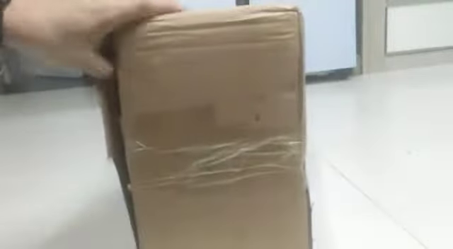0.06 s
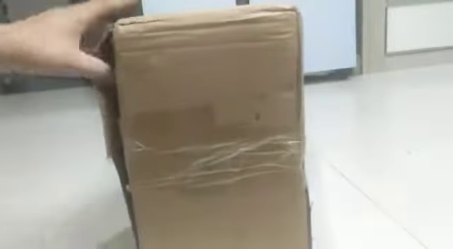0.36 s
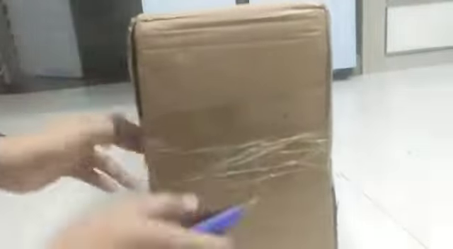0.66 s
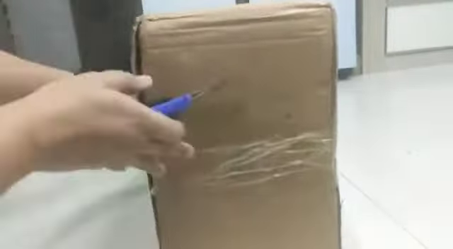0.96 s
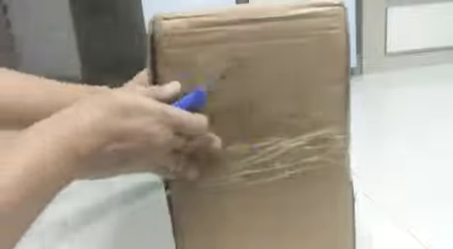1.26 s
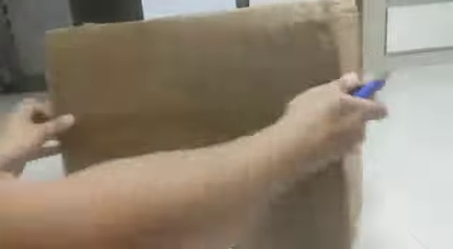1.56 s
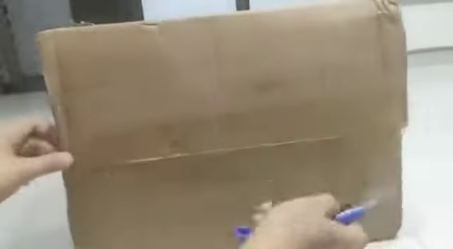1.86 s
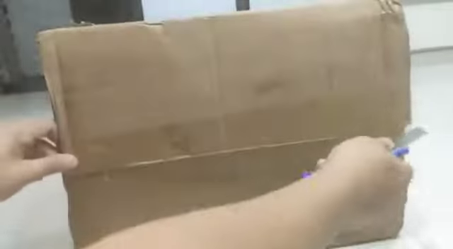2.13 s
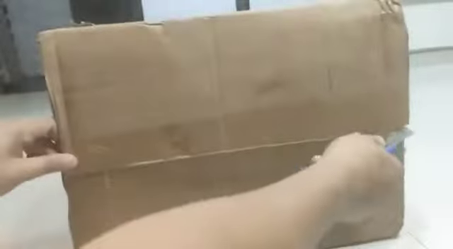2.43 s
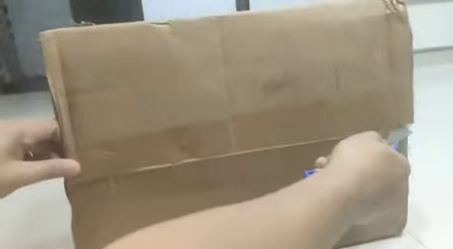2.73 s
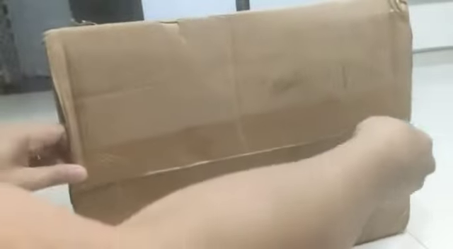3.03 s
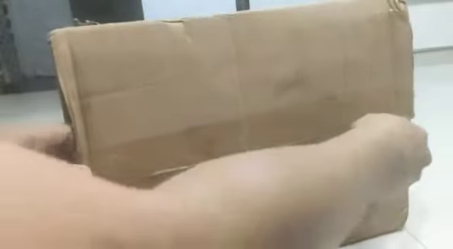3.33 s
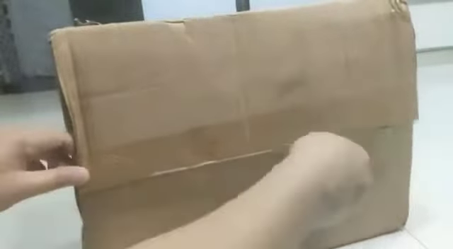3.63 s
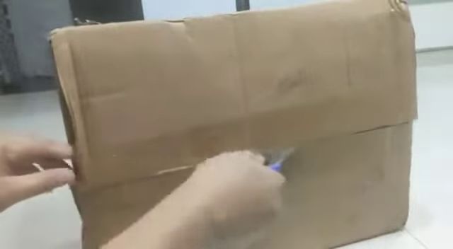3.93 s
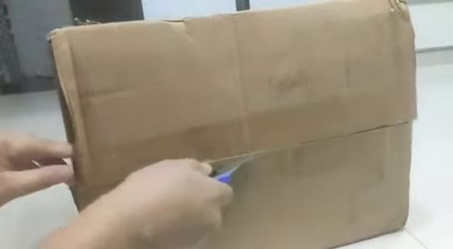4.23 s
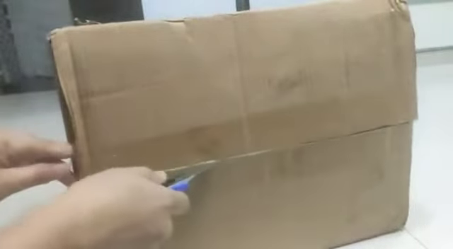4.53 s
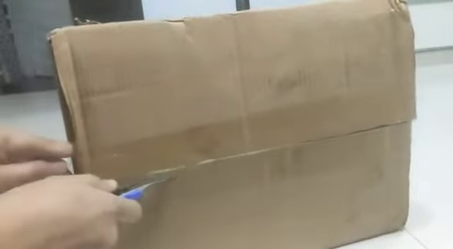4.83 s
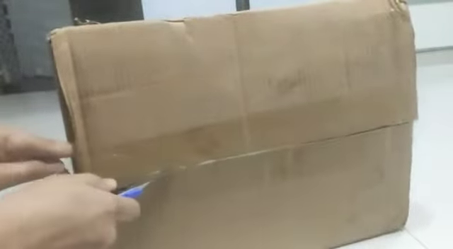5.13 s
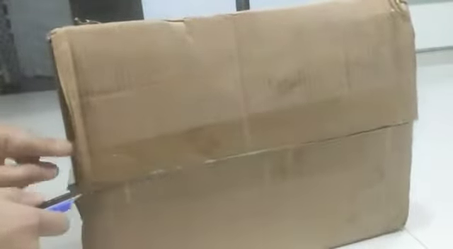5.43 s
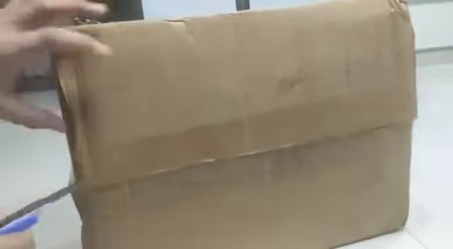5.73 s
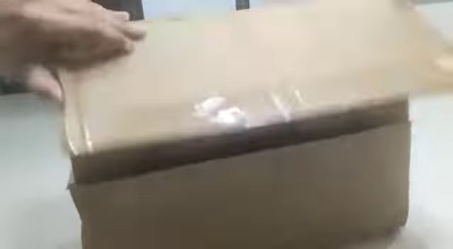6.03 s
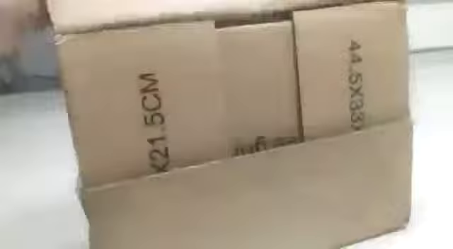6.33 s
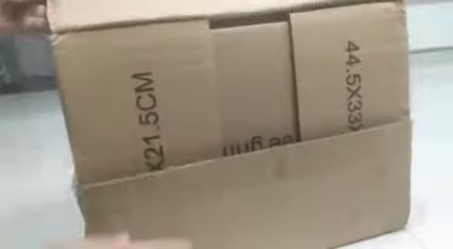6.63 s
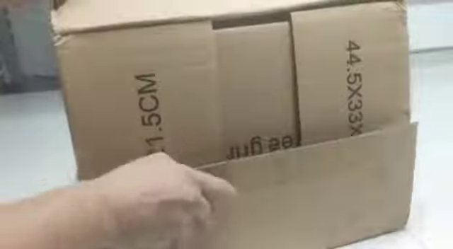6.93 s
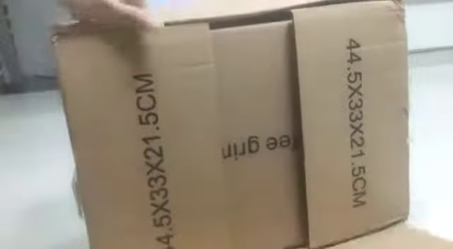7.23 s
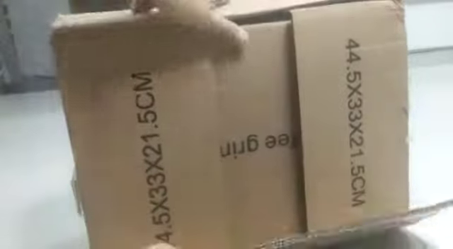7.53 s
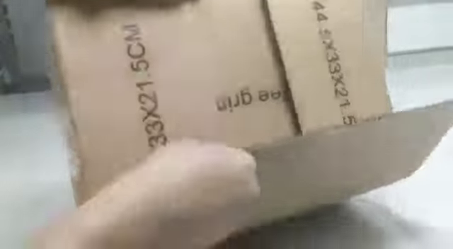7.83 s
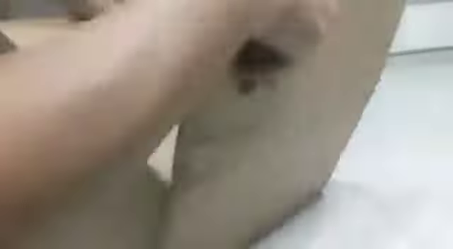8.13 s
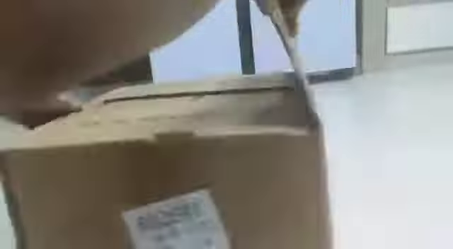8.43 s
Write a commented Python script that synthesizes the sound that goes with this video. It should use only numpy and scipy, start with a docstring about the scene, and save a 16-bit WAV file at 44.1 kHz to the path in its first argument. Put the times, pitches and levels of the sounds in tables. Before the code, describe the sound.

Hands rub and knock a hollow cardboard box, a utility knife cuts the tape, and the flaps rip open in a small room.

```python
"""A cardboard box is cut open in a small bare room. First hands rub the board: creases crack, knocks
boom in the hollow box, fingers squeak, and it creaks and slides round on the hard floor. From 3.3 s a
utility knife judders into the tape, ticks free and bumps along the seam. At 6 s the last strip rips in
a quick run of snaps, each a burst of tiny fractures. The flaps fold back, cracking, and at 8.4 s the
box tips over."""
import sys
import numpy as np
from scipy import signal
from scipy.fft import rfft, irfft
from scipy.io import wavfile
from scipy.ndimage import uniform_filter1d

SR = 44100
rng = np.random.default_rng(int(sys.argv[2]) if len(sys.argv) > 2 else 0)


def bounce(signal):
    """Save signal as a 16-bit WAV file at the path given by the first command-line argument."""
    frames = np.transpose(np.atleast_2d(signal))
    limited = np.clip(frames, -1, 1)
    pcm = np.round(limited * 32767).astype(np.int16)
    wavfile.write(sys.argv[1], SR, pcm)


N = 373527
TIME = np.arange(N) / SR


def amp(db):
    """Decibels to gain."""
    return 10 ** (np.asarray(db) / 20)


def unit_rms(x):
    """Scales each row to rms 1."""
    return x / np.sqrt(np.mean(x ** 2, -1, keepdims=True) + 1e-20)


def unit_hit(x):
    """Scales each row to the energy of 10 ms at rms 1."""
    return x / np.sqrt(np.sum(x ** 2, -1, keepdims=True) * 100 / SR + 1e-20)


def curve_at(points, hz):
    """Reads a curve on a log-frequency axis."""
    f, value = np.transpose(points)
    return np.interp(np.log(hz + 1), np.log(f + 1), value)


def eq(x, points):
    """Shapes the spectrum of x with an EQ curve."""
    hz = np.fft.rfftfreq(x.shape[-1], 1 / SR)
    return irfft(rfft(x) * amp(curve_at(points, hz)), x.shape[-1])


def band(x, lo_hz, hi_hz, order=3):
    """Causal band-pass."""
    return signal.sosfilt(signal.butter(order, [lo_hz, hi_hz], "band", fs=SR, output="sos"), x)


def resonate(x, hz, width_hz):
    """One resonance of gain 1."""
    return signal.lfilter(*signal.iirpeak(hz, hz / width_hz, SR), x)


def add(mix, s, sound):
    """Mixes a sound in at time s."""
    part = mix[:, max(round(s * SR), 0):][:, :sound.shape[-1]]
    part += sound[..., :part.shape[1]]


def track(events):
    """Lays (time, sound) pairs on one mid/side track."""
    out = np.zeros((2, N))
    for s, sound in events:
        add(out, s, sound)
    return out


def fader(times, db):
    """Gain riding through level points, silent outside them."""
    return amp(np.interp(TIME, times, db, left=-np.inf, right=-np.inf))


def wander(per_s):
    """Smooth random motion of rms 1."""
    hz = np.fft.rfftfreq(N, 1 / SR)
    return unit_rms(irfft(rfft(rng.standard_normal(N)) / (1 + (hz / per_s) ** 4), N))


def grit(size, spread_db):
    """Mid and side streams of tiny fractures of uneven size, 12 samples each."""
    sizes = amp(spread_db * np.clip(rng.standard_normal(size // 12 + 1), -2.5, 2.5))
    return rng.standard_normal((2, size)) * np.repeat(sizes, 12)[:size]


# EQ of the quiet room: (frequency [Hz], gain [dB])
ROOM_TONE_EQ = [(20, 1), (50, 2.5), (100, -5.5), (200, -0.5), (450, 3), (750, -4), (1400, -6.5),
                (2600, -14.5), (5000, -14), (6600, -17.5), (8200, -25), (14000, -32)]
def room_tone(db=-59):
    """A steady bed of dark noise."""
    return amp(db) * unit_rms(eq(rng.standard_normal((2, N)), ROOM_TONE_EQ))


# modes of the box: (frequency [Hz], width [Hz], gain [dB])
BOX_MODES = [(51, 85, -9), (126, 12, -9.5), (151.5, 27, -5), (193, 17.8, 1.5), (266.6, 35.4, -0.5),
             (323, 37, -1.5), (377.6, 42, 1.5), (521.5, 176, 2.5), (590, 268, 2), (860, 94, -7.5)]
def box_body(x):
    """The panels and the air inside ring."""
    return sum((-1) ** k * amp(db) * resonate(x, hz, width)
               for k, (hz, width, db) in enumerate(BOX_MODES))


# hand, blade or floor strokes the board:
# (start [s], length [s], hiss [dB], swell over the stroke [dB], scrape re hiss [dB], rumble re hiss [dB])
RUB_STROKES = [(0, 0.1, -46.5, 2, -3, -10.5), (0.206, 0.39, -57.5, -5, 0.5, -5.5),
               (0.51, 0.21, -46.5, 9.5, -10, -11), (0.77, 0.12, -59.5, 0, 0, -6),
               (0.937, 0.14, -59.5, -9, 0.5, -3), (1.1, 0.13, -62, 11, 3.5, -12),
               (1.422, 0.17, -58, -3, 11.5, -7), (1.731, 0.21, -48, -1, -9.5, -8),
               (2.298, 0.14, -55.5, 12, -10, -14), (2.524, 0.054, -64, -24, 3.5, 4),
               (2.635, 0.2, -53, -5, -4, -7), (2.84, 0.21, -61.5, 21, -4, -9), (3.024, 0.1, -61.5, 6, 3, 5),
               (3.217, 0.28, -52, -4.5, 1, -2), (3.485, 0.16, -54, -15.5, 6.5, 1.5),
               (3.708, 0.18, -54.5, 6.5, -1.5, -3), (3.926, 0.58, -58, -0.5, -2, -1.5),
               (4.476, 0.29, -59.5, 6.5, 0.5, -2), (5.016, 0.081, -49, -4.5, 4, 0),
               (5.177, 0.47, -54.5, -2, 0, -3.5), (5.645, 0.1, -47, -8.5, -4.5, -15),
               (5.944, 0.052, -40, 4, -6, -13), (5.995, 0.18, -37, -12, -10, -12),
               (6.13, 0.023, -34, -7.5, 4.5, -8), (6.21, 0.21, -46, -4, -7, -8),
               (6.453, 0.11, -37, 3, -6.5, -20), (6.595, 0.2, -50.5, 4, 2.5, -2),
               (6.887, 0.12, -53, -6, 0, -5), (6.994, 0.04, -44, 1.5, -5, 1),
               (7.089, 0.18, -49, 10.5, 2, -3), (7.31, 0.18, -54.5, 13, -4, -2),
               (7.465, 0.046, -50.5, -2, 3.5, -2), (7.564, 0.081, -49, 0, -1, -2),
               (7.673, 0.16, -47.5, 1, -0.5, -7.5), (7.867, 0.15, -49.5, 0, 2.5, -5.5),
               (8.019, 0.15, -45.5, 1, -2.5, -4), (8.165, 0.18, -50, 2, 1.5, -4),
               (8.315, 0.024, -47.5, 9, 3, -5), (8.357, 0.32, -45.5, -16, 3, 1)]
def stroke_envelopes(attack_s=0.012, release_s=0.056):
    """Gains of hiss, scrape and rumble: each stroke bites, swells or fades, and lifts off."""
    power = np.zeros((3, N))
    for s, length, db, swell_db, scrape_db, rumble_db in RUB_STROKES:
        t = np.arange(0, length + 10 * release_s, 1 / SR)
        shape = np.minimum(t / attack_s, 1) * np.exp(-np.maximum(t - length, 0) / release_s)
        travel = np.minimum(t / length, 1) - .5
        hiss = shape * amp(db + swell_db * travel)
        add(power, s, (hiss * amp([[0], [scrape_db], [rumble_db]])) ** 2)
    return np.sqrt(power)


def fibre_chirps(lo_hz, hi_hz, count, ring_s=0.0048, spread_db=3):
    """Tiny stick-slip squeaks, each at its own pitch."""
    t = TIME[:1024]
    when, pitch, size, side = rng.random((4, count, 1))
    hz = lo_hz * (hi_hz / lo_hz) ** pitch
    gain = amp(-spread_db * np.log(size + 0.042))
    chirps = gain * t * np.exp(-t / ring_s) * np.sin(2 * np.pi * hz * t)
    place = (when * (N - len(t))).astype(int) + np.arange(len(t)) + N * (side < .5)
    return unit_rms(np.bincount(place.ravel(), chirps.ravel(), 2 * N).reshape(2, N))


# EQ of rubbed board: (frequency [Hz], gain [dB])
RUB_EQ = [(500, 10.5), (1200, 8.5), (2200, -0.5), (3000, -2.5), (4000, -3.5), (5400, -5), (6700, -1.5),
          (8000, -12), (11000, -17), (14500, -28.5)]
def rubbing(hiss, scrape, rumble, grip_db=2, grip_per_s=35):
    """Fibres catch and let go, some with a squeak; the uneven grip shakes all bands together."""
    fibres = eq(grit(N, spread_db=4), RUB_EQ)
    grip = unit_rms(amp(grip_db * wander(grip_per_s)))
    panels = unit_rms(box_body(fibres) * amp(wander(grip_per_s)))
    board = unit_rms(band(fibres, 617, 2030)) + 0.54 * fibre_chirps(758, 1980, count=2400)
    paper = unit_rms(band(fibres, 1900, 17500)) + 0.26 * fibre_chirps(2756, 4760, count=3000)
    return grip * (amp(-1) * rumble * panels + amp(-4) * scrape * board + amp(-2) * hiss * paper)


# EQ of breaking board: (frequency [Hz], gain [dB])
FRACTURE_EQ = [(500, -9), (1200, 4), (2200, -0.5), (3000, -2), (4200, -2), (6700, -2.5), (8200, -10),
               (12000, -18.5), (14500, -30)]
# a snap's body, bite and top bands: (low edge [Hz], high edge [Hz])
SNAP_BANDS = [(600, 2200), (2200, 7200), (7200, 15000)]
def snap(db, body_db, top_db, hz, rise_s, decay_s, spread_db=1, ring_db=2, ring_width=0.092,
         edge_echo=0.23, colour=FRACTURE_EQ):
    """An avalanche of fractures rings a patch of board; db sets the bite, body and top are re bite."""
    t = TIME[:3072]
    past_peak = np.maximum(t - rise_s, 0)
    envelope = np.minimum(t / max(rise_s, 1e-4), 1) ** 2 * np.exp(-past_peak / decay_s)
    envelope *= 1 + 0.25 * np.exp(-past_peak / 0.001)  # the first break is the hardest
    crack = eq(grit(len(t), spread_db), colour) * envelope
    # the panel's edges throw the crack back at uneven delays, which hollows its colour
    delays = (SR * rng.uniform(.0002, .0012, 3)).astype(int)
    crack += edge_echo * sum((-1) ** k * np.roll(crack, d, 1) for k, d in enumerate(delays))
    crack += amp(ring_db) * resonate(crack, hz, max(ring_width * hz, 850))
    return sum(amp(db + offset) * unit_hit(band(crack, *edges))
               for offset, edges in zip((body_db, 0, top_db), SNAP_BANDS))


def crinkles(hiss, count=40, low_hz=1500, high_hz=6000):
    """Faint stray snaps come at random, riding the level of the rubbing."""
    out = np.zeros((2, N))
    for when, size, pitch in rng.random((count, 3)):
        hz = low_hz * (high_hz / low_hz) ** pitch
        crinkle = snap(db=-3 + 4 * size, body_db=-4, top_db=-9, hz=hz, rise_s=0.00066, decay_s=0.013)
        add(out, when * N / SR, hiss[int(when * N)] * crinkle)
    return out


# creases and cut edges crack: (time [s], bite [dB], body re bite [dB], ring [Hz], rise [s], decay [s])
CRACK_CUES = [(.147, -45, -1, 2400, 0.00098, 0.005), (.162, -47, 0, 3660, 0.00087, 0.012),
              (.593, -41.5, -3, 4090, 0.0055, .004), (.712, -44, -8, 2600, 0.0024, 0.011),
              (1.661, -45.5, 2.5, 1500, 0.0016, 0.0065), (2.2451, -30, -13.5, 2750, 0.001, 0.007),
              (2.794, -32, -10.5, 2920, 0.0037, 0.0039), (3, -41.5, -6, 5700, 0.00081, 0.01),
              (3.126, -49.5, 1, 1570, 0.0011, 0.0047), (3.196, -32, 0.5, 1500, 0.0016, 0.0038),
              (3.402, -48, 4, 1580, 0.0011, 0.0044), (4.6245, -48.5, -8, 5760, 0.0004, 0.0024),
              (4.9971, -31, 1, 1330, 0.00027, 0.003), (5.001, -39, -4, 1700, 0.00043, 0.002),
              (5.439, -37, 2, 1730, 0.003, 0.0048), (5.512, -45.5, 0, 4200, 0.0014, 0.014),
              (5.5305, -32, -1, 6450, 0.00059, 0.0057), (6.0265, -30.5, 4.5, 7450, 0.0012, 0.0062),
              (6.1719, -44.5, 8.5, 950, 0.00074, 0.0052), (6.236, -33, 1, 6590, 0.00063, 0.0075),
              (6.398, -34.5, -6, 4480, 0.00098, 0.0045), (6.4265, -19.5, -7, 3200, 0.0009, 0.0064),
              (6.4292, -21.5, -10, 7200, 0.00066, 0.0015), (6.4375, -28, -15, 2200, 0.00039, 0.0018),
              (6.5196, -29.5, 1, 1100, 0.0003, 0.0019), (6.5249, -28, -3.5, 4700, 0.00045, 0.0091),
              (6.63, -42.5, 6.5, 1270, 0.00052, 0.0021), (6.638, -35, -13, 4800, 0.00044, 0.009),
              (6.735, -53, 6, 1400, 0.001, 0.005), (6.802, -47, -9, 1580, 0.0014, 0.0043),
              (6.884, -45, -4, 2870, 0.0035, 0.027), (7.006, -44, 3.5, 1040, 0.00033, 0.006),
              (7.042, -33, -2, 2100, 0.0025, 0.0096), (7.205, -39.5, -4, 5000, 0.0037, 0.01),
              (7.2161, -33.5, 1.5, 2280, 0.00068, 0.0042), (7.2197, -25, -8, 4600, 0.0014, 0.0036),
              (7.2254, -32.5, -6, 2750, 0.0005, 0.0022), (7.394, -50.5, 7, 1900, 0.0009, 0.0032),
              (7.4014, -40.5, -3, 3300, 0.00066, 0.0036), (7.8777, -52.5, 18.5, 1090, 0.00059, 0.0066),
              (7.895, -58, 14, 1200, 0.00089, 0.005), (8.349, -43, 11.5, 2600, 0.0016, 0.0077),
              (8.372, -44, 12.5, 1420, 0.0039, 0.016)]
def cracks(top_db=-8, ref_db=-32, brightening=0.2):
    """Stiff board breaks, full and woody; the harder the crack, the brighter its top."""
    return track((s, snap(db, body_db, top_db + brightening * (db - ref_db), hz, rise, decay,
                          edge_echo=0.33))
                 for s, db, body_db, hz, rise, decay in CRACK_CUES)


def knock(db, hz, rattle_s=0.0076, panel_s=0.0093, band_ratio=1.29):
    """The struck panel thuds at its own pitch; a soft push and a short rattle drive the whole box."""
    t = TIME[:6144]
    phase = 2 * np.pi * hz * t
    rise_s = 0.0015 * 2 ** ((-23.5 - db) / 26)  # 26 dB harder halves the attack
    onset = np.minimum(t / rise_s, 1)
    push = (1 - phase) * np.exp(-phase)
    rattle = rng.standard_normal((2, len(t))) * onset * np.exp(-t / rattle_s)
    blow = unit_hit(box_body(push)) + unit_hit(box_body(rattle))
    boom = unit_hit(band(blow, hz / band_ratio, hz * band_ratio, order=1) + 0.29 * blow)
    thud = unit_hit(onset * np.exp(-t / panel_s) * np.array([np.sin(phase), np.cos(phase)]))
    return amp(db) * unit_hit(boom + 0.68 * thud)


# hits on the box: (time [s], level [dB], panel pitch [Hz])
KNOCK_CUES = [(0.164, -43.5, 297), (0.536, -42.5, 233), (.595, -39.5, 241), (0.707, -45, 323),
              (1.151, -47, 207), (1.198, -39, 188), (1.214, -41, 234), (1.623, -41, 226),
              (1.66, -41.5, 444), (2.245, -49, 222), (2.272, -48.5, 249), (2.372, -45, 392),
              (2.796, -47, 391), (2.999, -44, 377), (3.199, -33.5, 405), (3.966, -43, 260),
              (4.176, -49.5, 205), (4.559, -52, 278), (4.997, -31, 250), (5.111, -43.5, 375),
              (5.328, -45.5, 340), (5.441, -45, 343), (5.531, -32, 260), (5.647, -47, 308),
              (6.023, -28.5, 280), (6.1711, -25.5, 275), (6.1717, -30, 607), (6.248, -46, 800),
              (6.427, -39.5, 550), (6.52, -44, 643), (6.891, -37, 240), (7.003, -39, 228),
              (7.047, -40, 174), (7.049, -33, 331), (7.221, -33.5, 656), (7.81, -45, 286),
              (7.878, -36.5, 463), (7.937, -41.5, 413), (8.08, -41, 370), (8.354, -26, 224),
              (8.373, -24, 362), (8.388, -32.5, 280), (8.389, -31, 795), (8.412, -32.5, 795),
              (8.435, -31.5, 497), (8.452, -38, 550)]
def knocks():
    """Hands, flaps and floor strike the hollow box."""
    return track((s, knock(db, hz)) for s, db, hz in KNOCK_CUES)


def stick_slip(length, db, hz, width_hz, sag_hz_per_s=4100):
    """Fine catches drive one resonance that sinks in pitch."""
    t = np.arange(0, length, 1 / SR)
    grains = grit(len(t), spread_db=3) + 1j * grit(len(t), spread_db=3)
    catches = band(grains, 5, width_hz, order=2)
    cycles = np.cumsum(hz - sag_hz_per_s * t) / SR
    tone = (catches * np.exp(2j * np.pi * cycles)).real
    return amp(db) * unit_rms(tone * np.sqrt(np.sin(np.pi * t / length)))


# fingers on the tape: (start [s], length [s], level [dB], starting pitch [Hz])
SQUEAK_CUES = [(0.304, 0.017, -47.5, 3720), (0.333, 0.046, -66, 3750), (0.562, 0.016, -49, 3250),
               (0.975, 0.04, -61, 3930), (1.126, 0.035, -60, 3400)]
def finger_squeaks(scratch_db=-2, scratch_hz=4400):
    """Skin sticks and slips on smooth tape: a thin tone over a softer scratch."""
    return track((s, stick_slip(length, db, hz, width_hz=300)
                  + stick_slip(length, db + scratch_db, scratch_hz, width_hz=1500))
                 for s, length, db, hz in SQUEAK_CUES)


# taped board under strain: (time [s], bite [dB], body re bite [dB], decay [s], ring [Hz])
CREAK_CUES = [(0.477, -54, 2, .002, 3000), (.495, -46.5, -11, 0.0079, 3100), (.523, -51, -8, .002, 3800),
              (.536, -53, -10, .002, 6100), (.565, -45.5, -8, .005, 3820), (0.698, -41, -12, .0054, 3820),
              (1.553, -37.5, -5, 0.012, 3850), (1.58, -37, -25, 0.016, 3850),
              (1.754, -45.5, 3.5, 0.0093, 1860), (1.760, -36, -18, .0045, 3730),
              (1.7942, -31, -20, 0.007, 4240), (1.804, -37.5, -11.5, 0.0031, 4570),
              (1.855, -34.5, -10.5, .0069, 3450), (1.966, -41, -8.5, 0.011, 3760),
              (2.156, -51.5, -10, .0032, 3870), (2.2163, -42.5, -5, 0.01, 2400),
              (2.236, -42, -9, 0.01, 2900), (2.3713, -29, -10.5, 0.0048, 3220),
              (2.386, -44, -12, .004, 3550), (4.56, -54, -12, .0037, 3720), (4.759, -56.5, -2, .005, 3850),
              (4.926, -58.5, 0, .0039, 3700), (5.82, -37, -15, 0.015, 4600), (5.847, -35, -16, .007, 4100),
              (5.8827, -40, -20, .004, 4400), (5.891, -38.5, -18, 0.0032, 4700),
              (5.91, -28.5, -19, 0.02, 4000), (5.965, -39, -20, .004, 4200), (5.972, -35, -27, 0.011, 4700)]
def creaks(top_db=-12, rise_s=0.002):
    """Strained board gives a little, in short rasps that each squeak at their own pitch."""
    return track((s, snap(db, body_db, top_db, hz, rise_s, decay, ring_db=10, ring_width=0.18))
                 for s, db, body_db, decay, hz in CREAK_CUES)


# EQ of snapping tape: (frequency [Hz], gain [dB])
TAPE_EQ = [(500, -8.5), (1200, -2), (2200, 5.5), (3000, -0.5), (4200, 7), (6700, 1.5), (8200, -7.5),
           (12000, -10.5), (14500, -17.5)]
# tape lets go, singly and then in a run: (time [s], bite [dB], body re bite [dB], decay [s], ring [Hz])
TAPE_CUES = [(1.072, -61, -16, .004, 6000), (2.2446, -22, -20, 0.0033, 6100),
             (2.2484, -26, -20, 0.0013, 4400), (2.26, -33, -16, .005, 3900), (2.453, -49, -6, .003, 3800),
             (2.611, -54.5, -1, 0.0017, 6400), (2.659, -57, 1, .005, 6300),
             (4.733, -55.5, -7, 0.0027, 6440), (5.704, -46, -18, .0035, 6400),
             (5.823, -56, -16, .0054, 5200), (5.9102, -44, -5, 0.0033, 4800), (5.975, -37, -20, .005, 5200),
             (5.984, -48, -16, .0045, 6500), (5.9923, -19.5, -29, 0.007, 6800),
             (6.0067, -21.5, -14, 0.0055, 7100), (6.019, -20, -17, 0.011, 6760),
             (6.0335, -19.5, -11, 0.0045, 7000), (6.0486, -21, -22, .0035, 6600),
             (6.064, -25, -15, 0.0047, 5700), (6.079, -22.5, -13, 0.0099, 5200),
             (6.0942, -19.5, -14.5, 0.0043, 5600), (6.1052, -21.5, -9.5, .0055, 6900),
             (6.1165, -20.5, -14, 0.0043, 6600), (6.1431, -20.5, -13, .006, 4670),
             (6.155, -22.5, -16, 0.0027, 6600), (6.1599, -26, -22, 0.0019, 4200),
             (6.247, -18.5, -14, 0.0038, 5000)]
def tape_snaps(top_db=-1.5, rise_s=0.001):
    """Taut tape snaps: sudden, thin and very bright."""
    return track((s, snap(db, body_db, top_db, hz, rise_s, decay,
                          spread_db=0.5, ring_db=5.5, ring_width=0.64, colour=TAPE_EQ))
                 for s, db, body_db, decay, hz in TAPE_CUES)


# EQ of sliding board: (frequency [Hz], gain [dB])
SLIDE_EQ = [(59, -76), (100, -46), (134, -15), (186, -6), (238, -14), (376, -2), (471, -8), (556, -1),
            (859, -13.5), (1100, -10), (1960, -10.5), (6650, -9), (7530, -14), (14000, -26)]
# the box turns on the floor: (time [s], level [dB])
SLIDE_LEVELS = [(1.21, -60), (1.33, -47.5), (1.46, -45), (1.56, -43.5), (1.66, -46.5), (1.73, -50.5),
                (1.8, -78)]
def floor_slide():
    """Board on polished floor: an even hiss that swells and fades with the speed of the turn."""
    return unit_rms(eq(grit(N, spread_db=2), SLIDE_EQ)) * fader(*np.transpose(SLIDE_LEVELS))


# the blade's first drag along the seam: (time [s], hum [dB], squeak [dB])
JUDDER_LEVELS = [(3.33, -71, -69), (3.39, -45, -48), (3.425, -63, -66), (3.47, -58, -54), (3.5, -59, -56),
                 (3.52, -36.5, -47), (3.57, -46, -80), (3.595, -54, -74), (3.62, -39.5, -70),
                 (3.65, -83, -80)]
def blade_judder(hum_hz=385, hum_width_hz=55, squeak_hz=4650, squeak_width_hz=350,
                 slips_per_s=42, depth_db=5):
    """The dragged blade catches on the flutes, keeps one panel humming and squeaks thinly."""
    times, hum_db, squeak_db = np.transpose(JUDDER_LEVELS)
    drag = rng.standard_normal((2, N))
    hum = resonate(resonate(drag, hum_hz, hum_width_hz), hum_hz, hum_width_hz)
    hum /= np.sqrt(abs(uniform_filter1d(hum ** 2, size=1500)) + 1e-12)  # holds the hum steady
    squeak = unit_rms(resonate(resonate(drag, squeak_hz, squeak_width_hz), squeak_hz, squeak_width_hz))
    catches = unit_rms(amp(depth_db * np.sin(2 * np.pi * slips_per_s * TIME + wander(9.9))))
    return catches * (hum * fader(times, hum_db) + squeak * fader(times, squeak_db))


# cuts through the tape: (start [s], length [s], level [dB], starting pitch [Hz])
RASP_CUES = [(3.344, 0.06, -49, 1725), (3.494, 0.028, -54, 1452), (3.533, 0.044, -61, 1220),
             (3.604, 0.021, -47, 1314)]
def blade_rasps():
    """The blade saws into the tape, its pitch falling as the cut lengthens."""
    return track((s, stick_slip(length, db, hz, width_hz=170)) for s, length, db, hz in RASP_CUES)


# modes of the knife: (frequency [Hz], t60 [s], level [dB])
KNIFE_MODES = [(1250, 0.014, -11.5), (2650, .007, -15.5), (3340, 0.011, -7), (4030, .006, -10),
               (4660, .007, -3.5), (4840, 0.011, 2), (6200, 0.018, -9), (7800, 0.011, -27),
               (10840, .012, -21)]
# the knife slips free: (time [s], level [dB])
TICK_CUES = [(3.6718, -29.5), (3.673, -27), (3.6768, -35.5)]
def knife_ticks():
    """Each tick rings blade and handle."""
    t = TIME[:6144]
    quarter_turn = np.array([[0], [np.pi / 2]])  # between mid and side
    def mode(hz, t60):
        phase = 2 * np.pi * (hz * t + rng.random()) + quarter_turn
        return unit_hit(amp(-60 * t / t60) * np.sin(phase))
    def tick():
        return unit_hit(sum(amp(db) * mode(hz, t60) for hz, t60, db in KNIFE_MODES))
    return track((s, amp(db) * band(tick(), 800, 13000, order=2)) for s, db in TICK_CUES)


# the blade crosses the flutes in mid-seam: (time [s], level [dB], panel pitch [Hz])
FLUTE_CUES = [(4.251, -42.5, 277), (4.297, -45.5, 255), (4.343, -51, 200), (4.395, -42, 215),
              (4.449, -43.5, 285)]
def flute_bumps():
    """At each ridge of the corrugation the blade rasps briefly and gives the box a soft knock."""
    bumps = track((s, knock(db, hz)) for s, db, hz in FLUTE_CUES)
    rasps = track((s, snap(db - 15, body_db=6, top_db=-14, hz=1100, rise_s=0.0013, decay_s=0.0044))
                  for s, db, _ in FLUTE_CUES)
    return bumps + rasps


# pushes of air: (time [s], centre to peak [s], level [dB])
PUFF_CUES = [(4.9976, 0.00015, -15), (5.0083, 0.00067, -27.5), (6.173, 0.0052, -43)]
def air_puffs():
    """A panel springs free and pushes out one swing of pressure."""
    def swing(s, to_peak_s, db):
        u = np.clip((TIME - s) / to_peak_s, -9, 9)
        return -amp(db) * u * np.exp((1 - u ** 2) / 2)
    return sum(swing(*cue) for cue in PUFF_CUES) * np.array([[1], [0]])  # mid only


def rip_crackle(start_s=5.993, length_s=0.18, count=9, db=-36, scatter_db=3, low_hz=3000, high_hz=9000):
    """Between the last strip's big snaps, threads of glue and paper part at uneven moments."""
    return track((start_s + length_s * when,
                  snap(db + scatter_db * (2 * size - 1), body_db=-13, top_db=-1,
                       hz=low_hz * (high_hz / low_hz) ** pitch, rise_s=0, decay_s=0.0014, colour=TAPE_EQ))
                 for when, size, pitch in rng.random((count, 3)))


# decay of the room: (frequency [Hz], t60 [s])
ROOM_DECAY = [(150, 0.48), (530, 0.44), (1400, 0.24), (3700, 0.4), (9700, 0.31), (15000, 0.34)]
def room_response(tail_db=-7, early_db=-13, build_s=0.0033):
    """A few early echoes from floor and doors, then a dense tail that lasts longest in the bass."""
    size = SR * 3 // 5
    taps = rng.choice([-1., 1.], (2, size)) * (rng.random((2, size)) < 5000 / SR)
    hz, t, spectrum = signal.stft(taps, SR, nperseg=256)
    decay = amp(-60 * t / curve_at(ROOM_DECAY, hz)[:, None])
    tail = signal.istft(spectrum * decay, SR, nperseg=256)[1][:, :size]
    tail *= 1 - np.exp(-(TIME[:size] / build_s) ** 2)
    echoes = np.zeros((2, size))
    delays = (SR * rng.uniform(.004, .02, (2, 6))).astype(int)
    np.put_along_axis(echoes, delays, rng.choice([-1., 1.], (2, 6)), 1)
    return (amp(tail_db) * unit_rms(tail) + amp(early_db) * unit_rms(echoes)) / np.sqrt(size)


def room(x, shift_per_s=1.7):
    """Direct sound plus three reverbs; the echo pattern shifts as other spots of the box sound."""
    angle = 2 * np.pi * shift_per_s * TIME
    sends = (x * np.cos(angle), x * np.sin(angle), x[::-1])  # the last swaps mid and side
    reverb = sum(signal.oaconvolve(send, room_response(), axes=1)[:, :N] for send in sends)
    return x + reverb / np.sqrt(2)


# stereo width: (frequency [Hz], side minus mid [dB])
STEREO_WIDTH = [(60, -10), (200, -19), (380, -12), (690, -0.5), (1300, -2.5), (2400, -0.5), (4300, 0.5),
                (15000, -0.5)]
# the two channels' colour: (frequency [Hz], left minus right [dB])
STEREO_TILT = [(150, -2.4), (1200, -1.8), (4200, -0.3), (7500, -1.5), (13000, -3.5)]
# pan by the place where the box is worked: (time [s], left minus right [dB])
PAN = [(0, 2.5), (2, 2), (3.7, 3), (4.3, 2), (6.8, 1.7), (7.2, 2.5), (8.4, 3)]
def stereo(x):
    """Mid and side become left and right: nearly mono bass, wide treble."""
    hz = np.fft.rfftfreq(N, 1 / SR)
    width = amp(curve_at(STEREO_WIDTH, hz))
    mid, side = rfft(x) * np.array([np.ones_like(width), width]) / np.sqrt(1 + width ** 2)
    split = np.array([[.5], [-.5]])
    pair = irfft(np.array([mid + side, mid - side]) * amp(split * curve_at(STEREO_TILT, hz)), N)
    return pair * amp(split * np.interp(TIME, *np.transpose(PAN)))


def scene(boom_send=0.68, knife_send=0.78):
    """The mix: the low boom and the knife sit closer than the crackle that fills the room."""
    bed = room_tone()
    hiss, scrape, rumble = stroke_envelopes()
    boom = knocks() + flute_bumps() + blade_judder()
    ticks = knife_ticks()
    crackle = tape_snaps() + rip_crackle() + blade_rasps() + finger_squeaks() + floor_slide()
    crackle += cracks() + creaks() + crinkles(hiss) + rubbing(hiss, scrape, rumble)
    close = (1 - boom_send) * boom + (1 - knife_send) * ticks + air_puffs()
    return stereo(room(crackle + boom_send * boom + knife_send * ticks) + close + bed)


def record(dry, cutoff_hz=14600):
    """A steep high cut on the master."""
    lowpass = signal.firwin(255, cutoff_hz, window=("kaiser", 8), fs=SR)
    return signal.oaconvolve(dry, lowpass[None], "same")


dry = scene()
out = record(dry)
bounce(out)
```